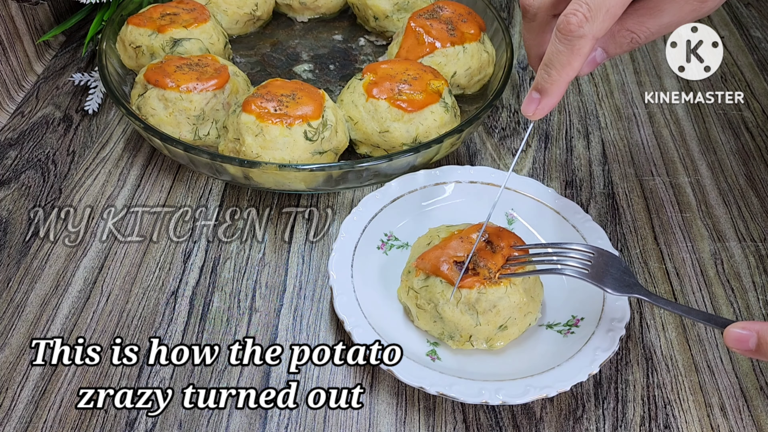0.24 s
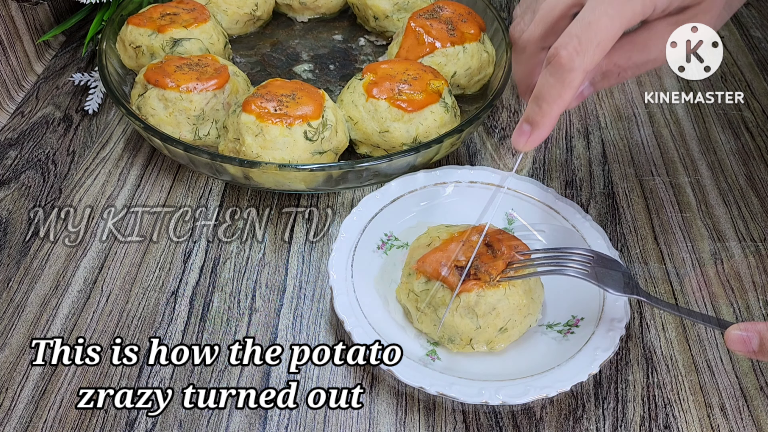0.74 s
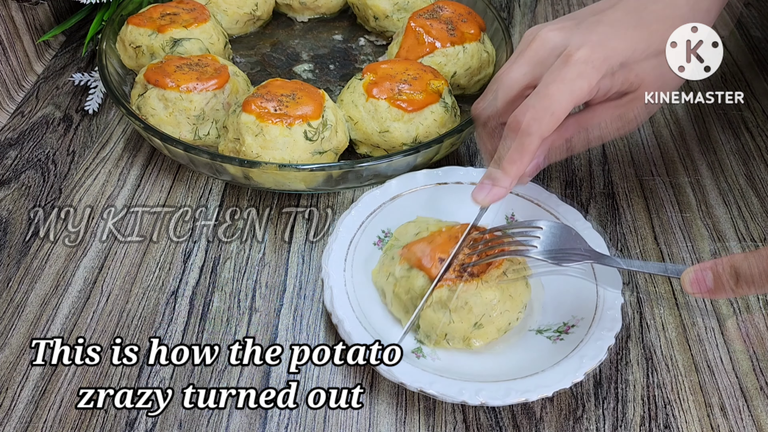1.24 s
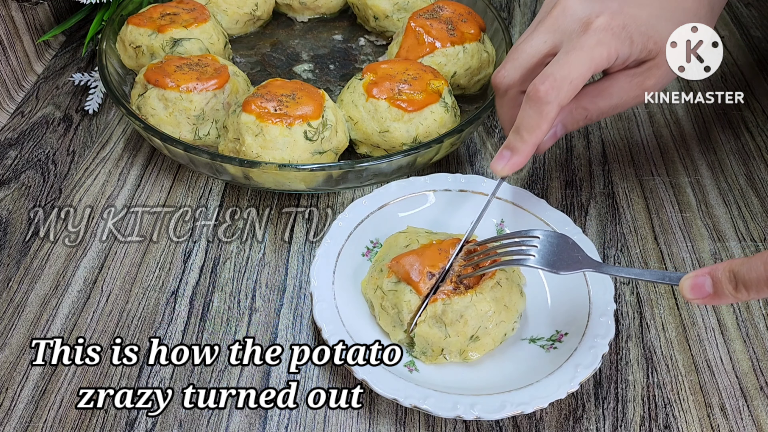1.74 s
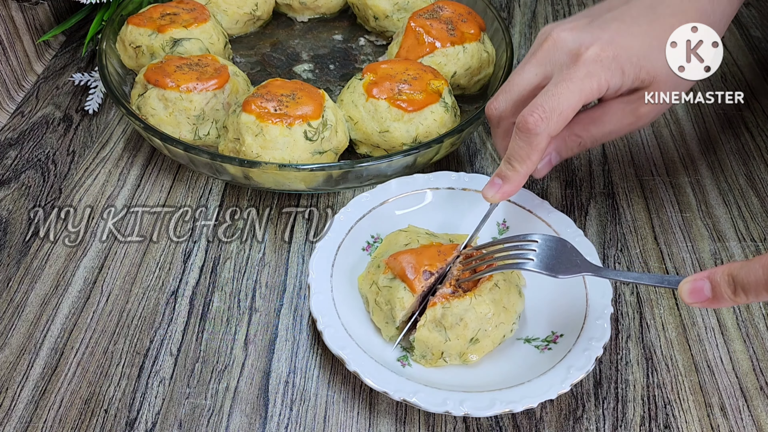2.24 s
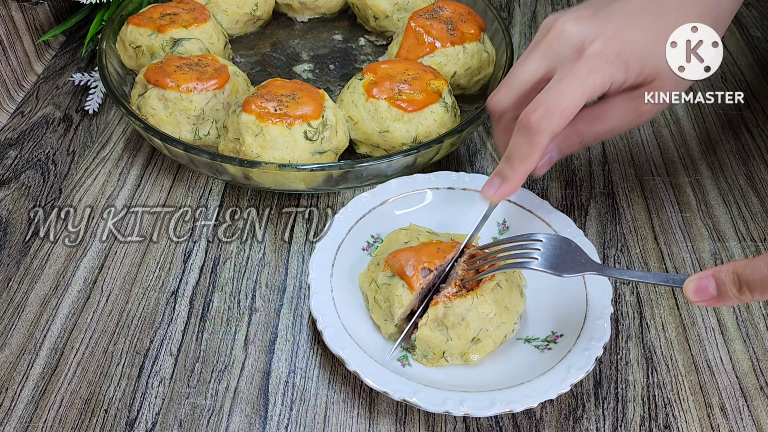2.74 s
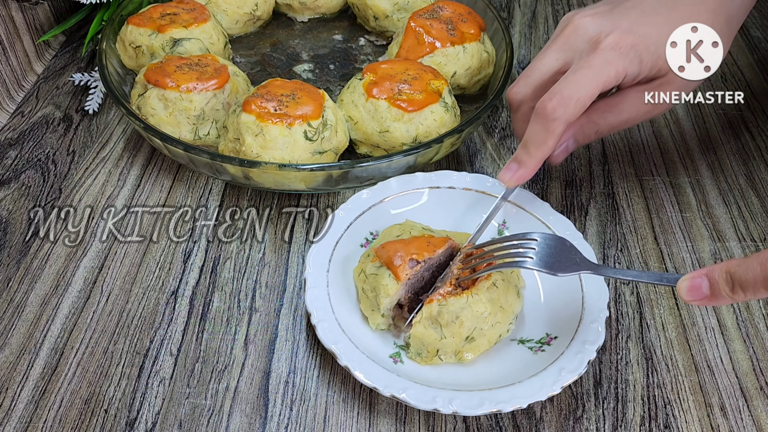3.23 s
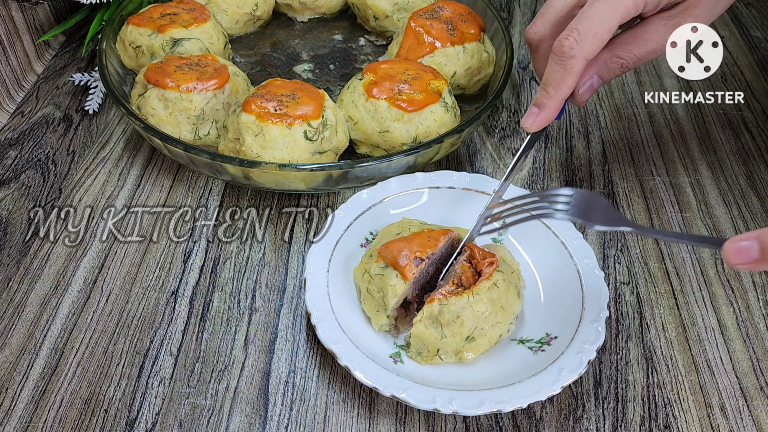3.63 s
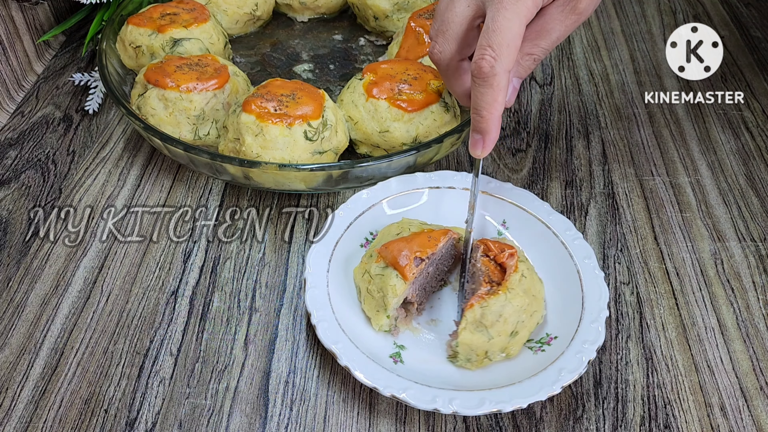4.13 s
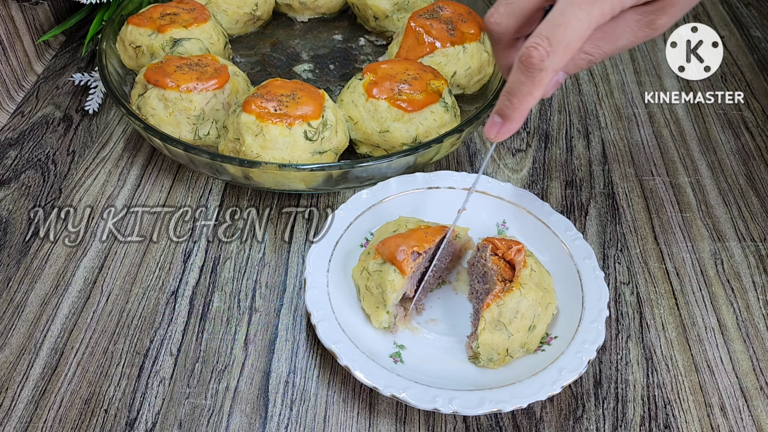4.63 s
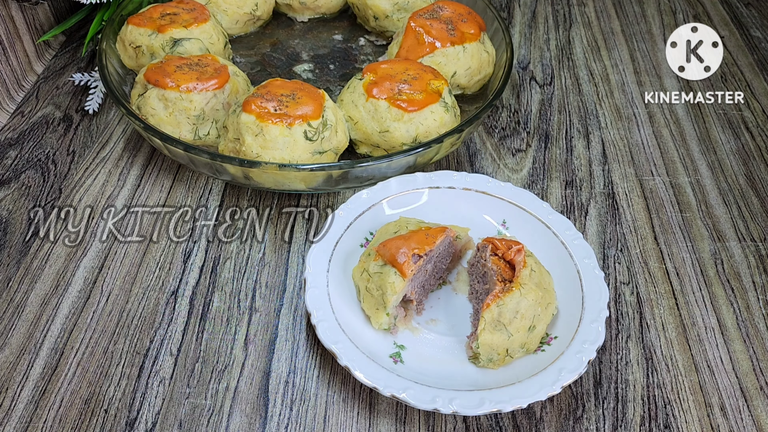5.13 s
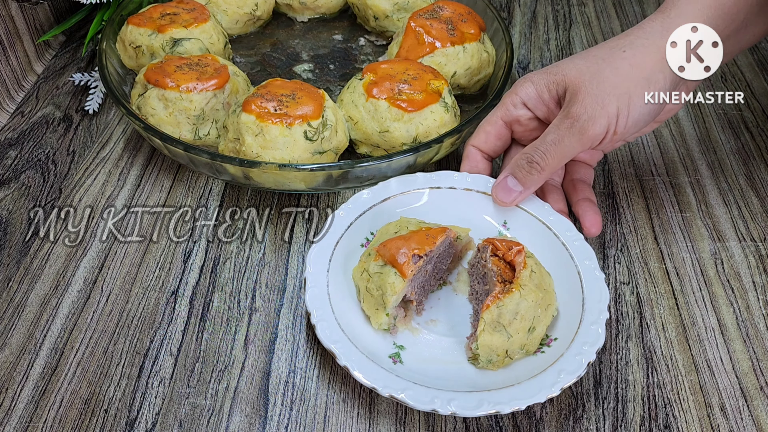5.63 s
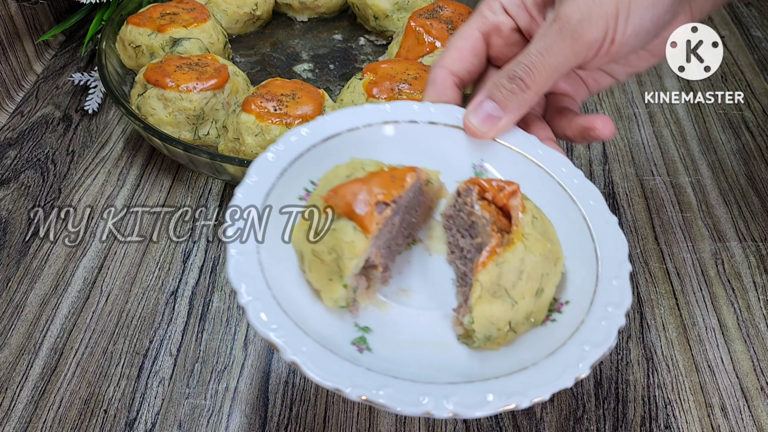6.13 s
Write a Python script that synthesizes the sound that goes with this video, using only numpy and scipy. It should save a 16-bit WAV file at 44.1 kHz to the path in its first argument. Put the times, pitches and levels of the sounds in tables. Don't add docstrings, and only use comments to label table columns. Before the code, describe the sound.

Close, dry stereo sound of cutting at a wooden table. Tiny wet ticks and muffled hand thumps come first, then short sawing strokes and bright porcelain clinks. The strokes grow harder, with stuttering plate slips and loud knocks, followed by a rapid fork clatter, flat steel clacks and thin scrapes. Afterwards there are only soft rubs, a gentle rim thud, and the low steady hum of a fridge.

```python
import sys
import numpy as np
from scipy import signal
from scipy.fft import rfft, irfft, next_fast_len
from scipy.io import wavfile
from scipy.ndimage import uniform_filter1d

SR = 44100
rng = np.random.default_rng(int(sys.argv[2]) if len(sys.argv) > 2 else 0)


def int16_out(signal):
    q = np.round(np.clip(np.atleast_2d(signal).T, -1, 1) * 32767)
    wavfile.write(sys.argv[1], SR, q.astype(np.int16))


def volts_from_decibels(level):
    exponent = np.asarray(level, float) / 20
    return 10 ** exponent


N = 280917


def evened(x):
    return x / np.sqrt(np.mean(x ** 2) + 1e-20)


def read(points, hz):
    f, value = np.transpose(points)
    return np.interp(np.log(hz + 1), np.log(f + 1), value)


def add(mix, s, sound):
    part = mix[..., round(s * SR):][..., :sound.shape[-1]]
    part += sound[..., :part.shape[-1]]


def wander(shape, samples):
    noise = rng.standard_normal(shape)
    return evened(uniform_filter1d(uniform_filter1d(noise, samples), samples))


def resonate(x, hz, width):
    turn = np.exp(2j * np.pi * hz * np.arange(len(x)) / SR)
    r = np.exp(-np.pi * width / SR)
    return 2 * (turn * signal.lfilter([1 - r], [1, -r], x / turn)).real


# (frequency [Hz], left-right likeness [-1 to 1])
LIKENESS = [(60, 0.49), (180, 0.77), (550, -0.22), (1650, -0.082), (4970, -0.2), (15000, -0.02)]


def room_noise(spectrum, db):
    frames, hz = N // 512 + 5, np.fft.rfftfreq(2048, 1 / SR)
    a, b, c, d = rng.standard_normal((frames, 1025, 4)).T
    same = np.clip(read(LIKENESS, hz), -1, 1)[:, None]
    left = a + 1j * b
    right = same * left + np.sqrt(1 - same ** 2) * (c + 1j * d)
    z = np.array([left, right]) * volts_from_decibels(read(spectrum, hz))[:, None]
    return volts_from_decibels(db) * evened(signal.istft(z, nperseg=2048, noverlap=1536)[1][:, :N])


# (frequency [Hz], level [dB per Hz])
RUMBLE_COLOUR = [(12, -53), (20, -15.5), (42, -6.5), (60, -3.5), (85, -4), (119, -8.5), (168, 1.5),
                 (189, -4), (311, -9), (400, -39), (520, -60), (880, -120)]
# (frequency [Hz], level [dB per Hz])
AIR_COLOUR = [(240, -29), (400, -0.5), (687, -4.5), (921, -0.5), (1460, 1), (2710, -9), (6340, -17.5),
              (9920, -17), (11600, -11), (14600, -24), (16000, -35.5)]


def kitchen_air():
    hum_hz, hum_db = 68.4, -60.5
    level, pitch = wander((2, N), 3000)
    hum = volts_from_decibels(hum_db + 1.6 * level) * np.sin(2 * np.pi * np.cumsum(hum_hz + 0.28 * pitch) / SR)
    return room_noise(RUMBLE_COLOUR, -67) + room_noise(AIR_COLOUR, -75.5) + hum


# (time [s], table top level [dB], frame level [dB])
HAND_PUSHES = [(0.418, -47.5, -64), (.49, -68, -58), (0.871, -56.5, -51), (1.21, -48.5, -56),
               (1.319, -49.5, -73), (1.539, -53, -53), (1.898, -46, -57.5), (2.06, -46.5, -53),
               (2.14, -47.5, -63), (2.439, -54.5, -54.5), (2.593, -37, -47), (2.725, -41, -62.5),
               (2.858, -35, -43.5), (3.078, -39, -49.5), (3.255, -36, -48), (3.4, -40.5, -57.5),
               (3.515, -36.5, -49), (3.94, -48, -66), (4.759, -56.5, -73), (5.45, -55.5, -57.5),
               (5.682, -56, -76), (5.79, -50, -75)]
# (table top level [dB], frame level [dB])
RESTING_DB = (-63.5, -71.5)
# (table top [dB/s], frame [dB/s])
PUSH_RISE = (258, 204.5)
# (table top [dB/s], frame [dB/s])
PUSH_FALL = (205, 194)


def pressure():
    pushes = np.array(HAND_PUSHES)
    since = (np.arange(0, N + 64, 64) / SR)[:, None, None] - pushes[:, :1]
    push_db = pushes[:, 1:] + np.where(since < 0, since * PUSH_RISE, -since * PUSH_FALL)
    gain = np.sqrt(volts_from_decibels(2 * push_db).sum(1) + volts_from_decibels(2 * np.array(RESTING_DB)))
    return np.repeat(gain.T, 64, axis=1)[:, :N]


# (frequency [Hz], width [Hz], level [dB])
TABLE_MODES = [(190, 22, 14), (213, 29, 8), (180, 16, 7), (135.1, 16, -29), (314, 16, -31)]


def table_modes(force):
    return sum(volts_from_decibels(db) * resonate(force, hz, w) for hz, w, db in TABLE_MODES)


def table(blows):
    top_gain, frame_gain = pressure()
    top = resonate(table_modes(rng.standard_normal(N)), 140, 180)
    frame = resonate(resonate(rng.standard_normal(N), 90, 35), 90, 35)
    shaken = evened(top) * top_gain + evened(frame) * frame_gain + volts_from_decibels(-15.5) * table_modes(blows)
    return signal.sosfilt(signal.butter(6, [38, 330], "band", fs=SR, output="sos"), shaken)


def chatter(ms, grain_db):
    draw = rng.standard_normal((2, 2000))
    t_ms = np.arange(2000) / SR * 1000
    clumps = volts_from_decibels(grain_db * evened(uniform_filter1d(draw[1], 25)))
    return evened(draw[0] * clumps) * (1 - np.exp(-2 * t_ms)) * np.exp(-(t_ms / max(ms, .5)) ** 0.95)


def strike(force, blows, s, db, edge_db, sparkle_db, ms=5.5):
    add(force[0], s, volts_from_decibels(db - 9.5) * chatter(ms, 2.5))
    fine_db = np.array([[edge_db], [sparkle_db]])
    add(force[1:], s, volts_from_decibels(db + 3 + fine_db) * chatter(ms * .8, 4.0))
    add(blows, s, volts_from_decibels(db) * signal.windows.hann(60))


# (time [s], level [dB], sparkle [dB])
FOOD_TICKS = [(0.388, -54.5, -4), (0.571, -65.5, -5.5), (0.649, -62.5, -2.5), (0.811, -56.5, -5.5),
              (0.859, -55.5, -16), (0.895, -53.5, -5.5), (1.199, -54, -15), (1.489, -63, -4.5),
              (2.155, -65, -8), (2.389, -54, -10.5), (2.468, -64, -4), (2.651, -61, -2.5), (2.78, -56, -6),
              (4.637, -79, 0.5), (4.654, -63, -1), (5.032, -70, 12.5)]


def wet_ticks(force, blows):
    for s, db, sparkle_db in FOOD_TICKS:
        strike(force, blows, s, db, -22.5, sparkle_db)


SPARKLE_LIFT = {"sawing": 1, "peeling": 8.5, "scrapes": 2.5, "handling": -7, "plate": -10.5, "blade": -8,
                "fork": 3, "flat": 0}


def strokes(rows, kind):
    depth_db, roundness = -24.5, 1.71
    gains = np.zeros((3, N))
    for peak_s, rise_s, fall_s, db, rasp_db in rows:
        t = np.arange(-1.5 * rise_s, 1.5 * fall_s, 1 / SR)
        away = np.where(t < 0, -t / rise_s, t / fall_s)
        swell = volts_from_decibels(db + depth_db * away ** roundness)
        add(gains, peak_s + t[0], swell * volts_from_decibels(np.array([[0], [rasp_db], [rasp_db + SPARKLE_LIFT[kind]]])))
    return gains


# (peak time [s], rise [s], fall [s], drag level [dB], rasp over drag [dB])
PEELS = [
    (.46, 0.064, .12, -99, 3.5),
    (.84, 0.035, 0.068, -88.5, 6.5),
    (2.28, 0.05, 0.12, -95, 13),
    (2.4, 0.064, 0.23, -78.5, -11),
    (2.66, 0.02, 0.064, -78.5, 3),
    (3.17, 0.056, 0.11, -84.5, 8.5),
    (5.17, .16, 0.13, -87.5, 8.5),
]


def peeling():
    return strokes(PEELS, "peeling")


# (peak time [s], rise [s], fall [s], drag level [dB], rasp over drag [dB])
SAW_STROKES = [(.99, 0.12, 0.041, -75.5, -21), (1.14, .05, 0.067, -76, -3), (1.25, .12, 0.15, -71, -8),
               (1.41, .02, 0.078, -62, -12), (1.572, 0.073, 0.078, -54.5, -13.5),
               (1.72, .07, 0.027, -71, -9), (1.895, .1, .035, -63, -13), (2.0, .03, .09, -53, -11),
               (2.166, .1, 0.053, -53, -10.5), (2.58, .05, 0.047, -58, -14), (2.72, .07, 0.027, -63, -12),
               (2.822, .055, 0.045, -50, -6.5), (2.93, .06, 0.1, -55.5, -11.5),
               (3.08, .04, 0.053, -55.5, -10.5), (3.222, .06, 0.018, -48.5, -14)]


def sawing():
    return strokes(SAW_STROKES, "sawing")


# (time [s], level [dB], edge [dB])
PLATE_SLIPS = [(1.165, -40, -28), (1.232, -56, -19), (1.57, -60, -28), (1.895, -45, -22), (1.983, -55, -12),
               (2.268, -49, -17.5), (2.794, -34, -24.5), (3.068, -37.5, -34), (3.102, -40, -30),
               (3.945, -36, -25), (3.96, -36, -28), (4.872, -59, -21), (5.444, -51.5, -22),
               (5.743, -51, -33)]
SLIP_SPARKLE_DB = 5


def slips(force, blows):
    for s, db, edge_db in PLATE_SLIPS:
        strike(force, blows, s, db, edge_db, edge_db + SLIP_SPARKLE_DB)


CLANG_LEVEL = {"plate": -2.5, "blade": 8, "fork": 3, "flat": -3}


def clang(modes, ms):
    t = np.arange(1500) / SR
    t60_s = .018
    damped = sum(volts_from_decibels(db - 60 * t / t60_s) * np.sin(2 * np.pi * hz * t) for hz, db, _ in modes)
    sound = signal.oaconvolve(chatter(ms, 4.0), damped)
    return np.pad(sound / abs(sound).max(), (0, SR // 4 - len(sound)))


GLOW = {"plate": (-15, .7), "blade": (-17, .55), "fork": (-24, .9), "flat": (-20, .9)}


def ring(modes, kind):
    glow_db, waver = GLOW[kind]
    t = np.arange(SR // 4) / SR
    sound = 0
    for (hz, db, t60), u, w in zip(modes, rng.standard_normal(len(modes)), wander((len(modes), len(t)), 160)):
        damped = volts_from_decibels(-60 * t / (0.23 * t60))
        glow = volts_from_decibels(glow_db - 60 * t / t60) * (1 + waver * w)
        sound = sound + volts_from_decibels(db + 1.7 * u) * (damped + glow) * np.sin(2 * np.pi * (hz * t + u))
    return (1 - np.exp(-t / .0006)) * sound


def knock(force, blows, rings, rows, modes, kind):
    for s, db, edge_db, ms, ring_db in rows:
        strike(force, blows, s, db, edge_db, edge_db + SPARKLE_LIFT[kind], ms)
        struck = ring(modes, kind) + volts_from_decibels(CLANG_LEVEL[kind]) * clang(modes, ms)
        add(rings, s, volts_from_decibels(db + ring_db - 6) * struck)


# (time [s], blow [dB], edge [dB], chatter [ms], ring [dB])
BLADE_HITS = [
    (1.295, -27, -20, 3.5, -6),
    (1.302, -32, -16, 3, -16),
    (1.366, -39, -36, 4.2, -3),
    (2.852, -11.5, -16, 3.1, -12),
    (2.858, -24, -16, 2.5, -16),
    (2.874, -27, -24, 2.5, -14),
    (3.24, -18.5, -12, 3.4, -16),
    (3.245, -24, 0, 1.7, -5),
    (3.281, -25, -16.5, 12, -8),
]
# (frequency [Hz], level [dB], t60 [s])
BLADE_MODES = [(1750, -8, .12), (2300, -9, .06), (2960, 0, .06), (3880, -11, .27), (6363, -3, .2),
               (6420, -5, .2), (9335, -0.5, .17), (9440, -5, .15), (12680, -6, .12)]


def blade_knocks(force, blows, rings):
    knock(force, blows, rings, BLADE_HITS, BLADE_MODES, "blade")


# (time [s], blow [dB], edge [dB], chatter [ms], ring [dB])
PLATE_HITS = [
    (1.366, -22, -11, 3.74, -8),
    (1.376, -32, -12, 3, -6),
    (2.053, -14, -21, 3.7, -13),
    (3.244, -11.5, -16, 4.1, -12),
]
# (frequency [Hz], level [dB], t60 [s])
PLATE_MODES = [(602, -9, .25), (1112, -6, .17), (1717, -0.5, .17), (1922, -7, .15), (2508, -6, .24),
               (2950, -4, .05), (3600, -8, .17), (4128, -6.5, .24), (5630, -18, .12), (6340, -19, .25),
               (7130, -10, .12), (8820, -19, .16), (10600, -17, .12), (11670, -12, .08)]


def plate_knocks(force, blows, rings):
    knock(force, blows, rings, PLATE_HITS, PLATE_MODES, "plate")


# (first slip [s], gap [s], strongest slip [s], level [dB], edge [dB])
STUTTERS = [
    (2.561, 0.011, 2.583, -37.5, -18.5),
    (2.684, 0.015, 2.697, -42, -33),
    (2.711, .0115, 2.732, -38, -25),
]
STUTTER_SLIPS = 4, 2, 3


def judders(force, blows):
    fade_db_per_s = 349
    for (first_s, gap_s, top_s, db, edge_db), count in zip(STUTTERS, STUTTER_SLIPS):
        for k in range(count):
            s = first_s + k * gap_s
            strike(force, blows, s, db - fade_db_per_s * abs(s - top_s), edge_db, edge_db + SLIP_SPARKLE_DB)


# (peak time [s], rise [s], fall [s], drag level [dB], rasp over drag [dB])
GLAZE_SCRAPES = [(3.3, .012, 0.062, -56.5, -5), (3.41, 0.02, 0.15, -55.5, 5), (3.52, .04, .06, -48, 2),
                 (3.55, 0.017, .1, -57.5, -10.5), (3.905, 0.021, 0.061, -47.5, -7),
                 (4.09, 0.107, 0.087, -47.5, -5), (3.955, .04, .03, -52, -12), (4.165, .06, .04, -60, 0),
                 (4.22, .04, .08, -58, 1), (4.275, .09, .045, -58, 2.5), (4.355, .09, .03, -67, -2)]


def scrapes():
    return strokes(GLAZE_SCRAPES, "scrapes")


# (time [s], blow [dB], edge [dB], chatter [ms], ring [dB])
FORK_HITS = [(3.36, -26, -19, 7.3, -11), (3.408, -25, -15, 10, -10), (3.452, -34, -6, 3.5, -5),
             (3.49, -33, -9, 5, -6), (3.496, -19, -4, 3.5, -4), (3.501, -29, -6, 4, -10),
             (3.508, -17, -8, 2.2, -11), (3.515, -28, -8, 3, -8), (3.521, -21, -9, 2, -9),
             (3.527, -28, -8, 4, -8), (3.537, -25, -7.5, 4, -10), (3.544, -29, -8, 4, -9),
             (3.595, -44, -18, 6, -4)]
# (frequency [Hz], level [dB], t60 [s])
FORK_MODES = [(2860, -5, 0.2), (3000, -4, 0.23), (3328, 3, 0.16), (3396, -0.5, .16), (3630, 1, .04),
              (5316, -8.5, 0.11), (5870, -2, 0.17), (9670, -4, 0.2), (10600, -12, .054)]


def fork_knocks(force, blows, rings):
    knock(force, blows, rings, FORK_HITS, FORK_MODES, "fork")


# (time [s], blow [dB], edge [dB], chatter [ms], ring [dB])
FLAT_HITS = [
    (3.894, -16.5, -19, 2.6, -10),
    (3.921, -30, -15, 3.3, -3),
    (3.987, -33, -12.5, 4.8, 3),
    (4.02, -33, -15, 4, -8.5),
    (4.031, -39, -18, 7.3, -2.5),
]
# (frequency [Hz], level [dB], t60 [s])
FLAT_MODES = [(720, 2, 0.071), (953, -6, 0.085), (2244, -6.5, 0.11), (2770, -2.5, 0.057),
              (4830, -1.5, 0.061), (5490, -2.5, 0.058), (6950, 0.5, 0.038)]


def knife_laid_flat(force, blows, rings):
    knock(force, blows, rings, FLAT_HITS, FLAT_MODES, "flat")


# (peak time [s], rise [s], fall [s], drag level [dB], rasp over drag [dB])
HAND_RUBS = [
    (4.46, 0.04, 0.22, -79, 1),
    (4.83, 0.23, 0.22, -78.5, 6),
    (5.456, 0.033, 0.13, -74, -6.5),
    (5.8, .09, .045, -65, -22),
    (6.03, 0.45, 0.5, -91.5, 17),
]


def handling():
    return strokes(HAND_RUBS, "handling")


# (time [s], level [dB])
RIM_THUDS = [
    (5.744, -68),
    (5.77, -62),
    (5.795, -49),
    (5.811, -55),
]
# (frequency [Hz], level [dB], t60 [s])
RIM_MODES = [(343, -0.5, 0.26), (463, 9, 0.24), (508, 7, 0.21), (704, -5, 0.37), (2070, 5.5, 0.069)]


def rim_thuds(rings):
    for s, db in RIM_THUDS:
        add(rings, s, volts_from_decibels(db - 9.5) * ring(RIM_MODES, "flat"))


def grit(per_s, spread_db, smooth):
    heights = volts_from_decibels(spread_db * np.minimum(rng.exponential(1, N), 4))
    catches = heights * (rng.random(N) < per_s / SR) * rng.choice([-1, 1], N)
    flutter = volts_from_decibels(2.0 * evened(uniform_filter1d(rng.standard_normal(N), 300)))
    return evened((evened(catches) + smooth * rng.standard_normal(N)) * flutter)


def body(spectrum, peaks):
    hz = abs(np.fft.fftfreq(8192, 1 / SR))
    level_db = read([(1, -76)] + spectrum + [(SR, -80)], hz)
    level_db += sum(db / (1 + ((hz - f) / (w / 2)) ** 2) for f, w, db in peaks)
    log_gain = level_db * np.log(10) / 20
    response = np.fft.ifft(np.exp(log_gain - 1j * signal.hilbert(log_gain).imag)).real[:4096]
    return response / np.linalg.norm(response)


# (frequency [Hz], level [dB])
DRAG_COLOUR = [(260, -41), (440, -16.5), (532, 1), (618, -12), (705, -6.5), (933, -2.5), (1650, -13),
               (2100, -8), (2730, -37), (4620, -120)]
EDGE_COLOUR = [(1120, -49), (1900, -14.5), (2500, -5.5), (3420, -7.5), (4110, -9), (5700, -18), (7410, -21),
               (12500, -120)]
SPARKLE_COLOUR = [(3180, -30.5), (5400, -5), (7440, -5), (8720, -3), (10400, -5.5), (12400, -2.5),
                  (15000, -12.5)]
SKIN_COLOUR = [(900, -30), (1700, -8), (2400, -3), (4200, -6), (6500, -11), (9500, -17), (13000, -40)]
# (frequency [Hz], width [Hz], level [dB])
WOOD_HUMPS = [(476, 71, 4.5), (691.4, 120, 9.5), (1012, 10, -2), (1243, 140, 4.5), (1520, 200, 8),
              (1840, 70, -4.5)]
TEETH_HUMPS = [(3000, 1500, 2), (3500, 180, -2), (4026, 110, 3.5), (5800, 200, 2), (6400, 170, 4),
               (9600, 320, 1.5), (11130, 200, 5)]
FLAT_HUMPS = [(620, 250, 5), (950, 170, 9), (1220, 190, 8), (2245, 100, 6.5), (2880, 200, 6), (4350, 60, 9),
              (5180, 930, 9), (7900, 200, 6), (10880, 920, 3)]
HELD_HUMPS = [(894, 60, 12), (2320, 130, 15), (2750, 250, 6), (3250, 90, 7), (3800, 170, 7), (4140, 120, 6),
              (5650, 100, 4)]
LIFTED_HUMPS = [(2500, 300, 4), (3110, 90, 4), (3770, 110, 4), (4140, 100, 7), (5650, 100, 6),
                (6380, 80, 4)]
POSE_CHANGES = 3.885, 4.4, 4.95, 5.85


def rubbing_bodies(force):
    colours = DRAG_COLOUR, EDGE_COLOUR, SPARKLE_COLOUR
    upright = [body(DRAG_COLOUR, WOOD_HUMPS), body(EDGE_COLOUR, TEETH_HUMPS), body(SPARKLE_COLOUR, TEETH_HUMPS)]
    flat = [body(colour, FLAT_HUMPS) for colour in colours]
    held = [body(colour, HELD_HUMPS) for colour in colours]
    lifted = [body(colour, LIFTED_HUMPS) for colour in (DRAG_COLOUR, SKIN_COLOUR, SPARKLE_COLOUR)]
    pose = np.array([0, 1, 2, 0, 3])[np.searchsorted(POSE_CHANGES, np.arange(N) / SR)]
    rub = 0
    for k, bodies in enumerate((upright, flat, held, lifted)):
        rub = rub + signal.oaconvolve(force * (pose == k), np.array(bodies), axes=1)
    return shifting(rub[:, :N].sum(0), 3.1)


def shifting(x, depth_db):
    _, _, z = signal.stft(x, SR, nperseg=512)
    patches = rng.standard_normal(z.shape[::-1]).T
    patches = uniform_filter1d(uniform_filter1d(patches, 4, axis=0), 14, axis=1)
    return signal.istft(z * volts_from_decibels(depth_db * evened(patches)), SR, nperseg=512)[1][:N]


# (frequency [Hz], width [Hz], level [dB])
BOARD_MODES = [(364, 12, -10), (548, 16, 1.5), (772, 21, -3), (760, 35, 0), (1339, 39, -8)]


def board(blows):
    sound = volts_from_decibels(-5) * sum(volts_from_decibels(db) * resonate(blows, hz, w) for hz, w, db in BOARD_MODES)
    return signal.sosfilt(signal.butter(2, 120, "high", fs=SR, output="sos"), sound)


def cutlery():
    force = peeling() + sawing() + scrapes() + handling()
    force *= [grit(990, 3.0, 0.54), grit(2500, 3.0, 0.9), grit(7000, 3.0, 0.37)]
    rings, blows = np.zeros(N), np.zeros(N)
    for small in (wet_ticks, slips, judders):
        small(force, blows)
    for hard in (blade_knocks, plate_knocks, fork_knocks, knife_laid_flat):
        hard(force, blows, rings)
    rim_thuds(rings)
    return rubbing_bodies(force) + rings + board(blows), blows


def ports(x):
    size, side = next_fast_len(N), 0
    hz = np.fft.rfftfreq(size, 1 / SR)
    same = np.clip(read(LIKENESS, hz), -.9, 1)
    apart = np.sqrt((1 - same) / (1 + same)) * hz ** 2 / (hz ** 2 + 800 ** 2)
    turn = np.pi * 11 * np.arange(N) / SR
    lags = np.geomspace(.0004, .002, 10)[:, None]
    for k in range(3):
        ripple = evened(np.sin(2 * np.pi * (hz * lags + rng.random(lags.shape))).sum(0))
        phase = 1.5 * ripple - 2 * np.pi * hz * .002
        share = np.sqrt(2 / 3) * abs(np.cos(turn + k * np.pi / 3))
        side = side + irfft(rfft(x * share, size) * apart * np.exp(1j * phase), size)[:N]
    return np.array([x + .85 * side, x - .85 * side])


# (frequency [Hz], t60 [s])
KITCHEN_T60 = [(200, 0.18), (1000, 0.087), (4000, 0.13), (12000, 0.032)]


def walls(x):
    taps = np.zeros((2, SR // 2))
    at = np.arange(150, SR // 2 - 20, 20) + rng.integers(0, 20, (2, (SR // 2 - 151) // 20))
    np.put_along_axis(taps, at, rng.choice([-1., 1.], at.shape), 1)
    hz, t, z = signal.stft(taps, SR, nperseg=256)
    fade = volts_from_decibels(-60 * t / read(KITCHEN_T60, hz)[:, None])
    tail = signal.istft(z * fade, SR, nperseg=256)[1]
    return signal.fftconvolve(x[None], tail / np.linalg.norm(tail[0]), axes=1)[:, :N]


def scene():
    near, blows = cutlery()
    boom = table(blows)
    sway_hz, sway_width_hz, sway_db = 300, 80, -4
    rocking = resonate(resonate(boom, sway_hz, sway_width_hz), sway_hz, sway_width_hz)
    sway = volts_from_decibels(sway_db) * np.roll(rocking, SR // 1000)
    plate_side = ports(near) + volts_from_decibels(-12.5) * walls(near)
    table_side = boom * volts_from_decibels(np.array([[.6], [-.6]])) + np.array([sway, -sway])
    return plate_side + table_side + kitchen_air()


def roll_off(x):
    return signal.sosfilt(signal.butter(12, 16500, fs=SR, output="sos"), x)


def record(dry):
    hz, _, z = signal.stft(dry, SR, nperseg=512)
    power = (abs(z[:, 12:]) ** 2).sum((0, 1))
    busy_db = 10 * np.log10(signal.lfilter([0, 0, .4], [1, -.6], power) + 1e-12)
    top_hz = np.clip(15600 - 220 * (busy_db + 51), 13500, 15600)
    low_pass = 1 / (1 + np.exp((hz[:, None] - top_hz) / 60))
    mix = signal.istft(z * low_pass, SR, nperseg=512)[1][:, :N]
    return roll_off(mix)


dry = scene()
out = record(dry)
int16_out(out)
```